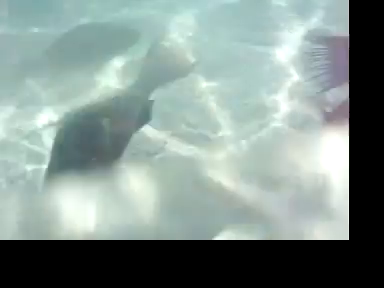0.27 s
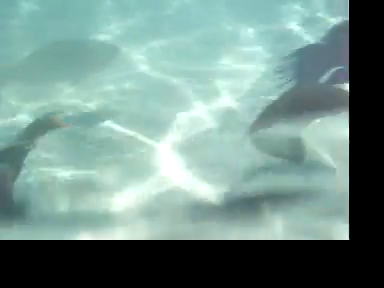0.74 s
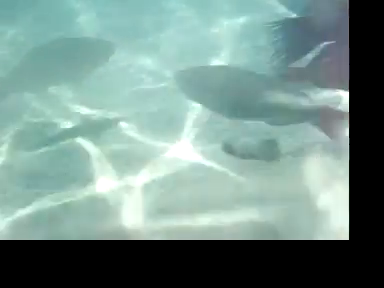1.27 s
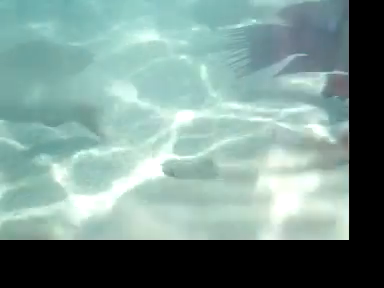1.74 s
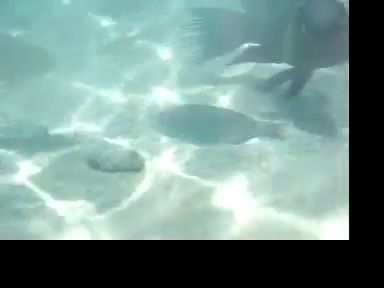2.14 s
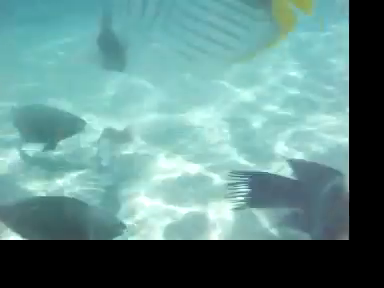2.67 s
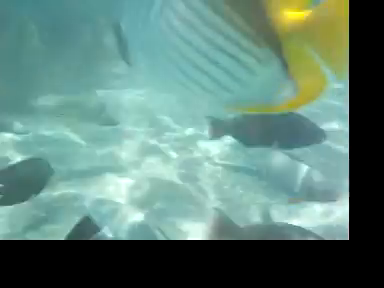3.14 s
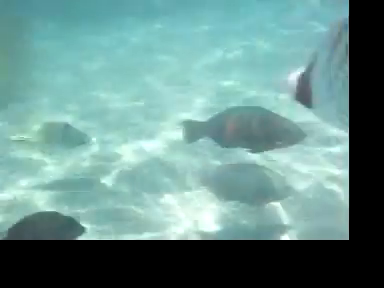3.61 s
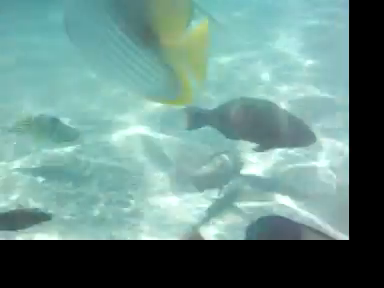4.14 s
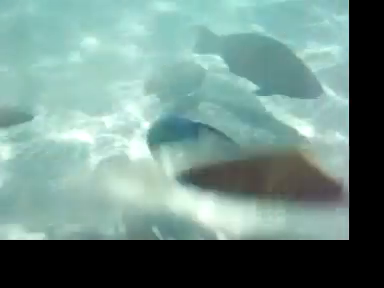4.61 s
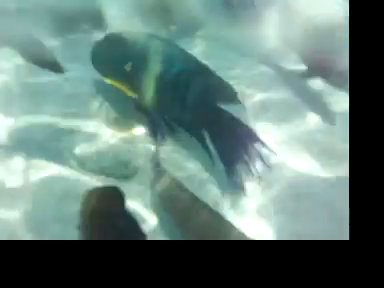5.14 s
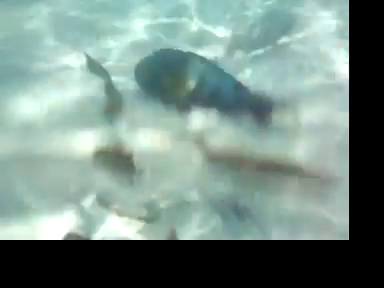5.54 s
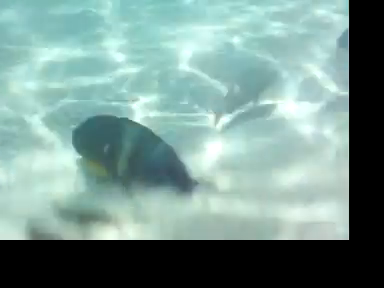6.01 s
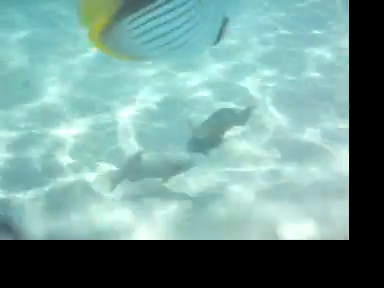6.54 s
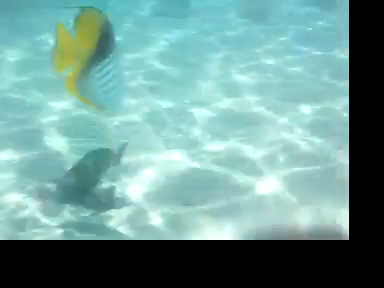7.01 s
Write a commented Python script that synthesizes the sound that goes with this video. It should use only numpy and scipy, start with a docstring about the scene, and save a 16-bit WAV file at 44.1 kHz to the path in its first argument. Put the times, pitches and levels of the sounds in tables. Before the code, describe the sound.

Underwater, muffled low rumble and gurgling currents wash round a submerged microphone, with deep bubble glugs, then two sharp clicks around a dull knock.

```python
"""Shallow sea water rumbles, gurgles, washes and hisses round a waterproof camera case: shaped, drifting noise.
Air pockets glug and small bubbles blip as gliding sines; fizz is clouds of impulses, faint ticks are
band-passed noise bursts. Near the end the case rings under two sharp clicks with a duller knock between;
the first click pushes the recorder's gain down."""
import sys
import numpy as np
from scipy import signal
from scipy.fft import rfft, irfft, next_fast_len
from scipy.io import wavfile
from scipy.ndimage import uniform_filter1d, map_coordinates

SR = 44100
rng = np.random.default_rng(int(sys.argv[2]) if len(sys.argv) > 2 else 0)


def digitize_waveform(pressure):
    """Quantize a signal to 16-bit integers and store it at the path in sys.argv[1].

    Rows of a 2-D input are taken as channels; values are limited to [-1, 1].
    """
    field = np.atleast_2d(pressure).T
    bounded = np.clip(field, -1, 1)
    quanta = np.round(bounded * 32767).astype(np.int16)
    wavfile.write(sys.argv[1], SR, quanta)


N = 321048


def amp(db):
    """Decibels to gain."""
    return 10 ** (np.asarray(db) / 20)


def unit(x):
    """x at rms 1."""
    return x / np.sqrt(np.mean(x ** 2) + 1e-20)


def seconds(length):
    """Time axis in s."""
    return np.arange(length) / SR


def add(track, t_s, sound):
    """Mix a sound into the track at t_s."""
    part = track[round(t_s * SR):][:len(sound)]
    part += sound[:len(part)]


def curve(points):
    """(t/s, value) points joined by straight lines, one value per sample."""
    return np.interp(seconds(N), *np.transpose(points))


def bell(t_s, half_s):
    """Bell-shaped rise and fall of height 1 round t_s."""
    return np.exp(-np.minimum(((seconds(N) - t_s) / half_s) ** 2, 20))


def wobble(rate_hz):
    """Smooth random curve, rate_hz knots a second."""
    knots = rng.standard_normal(int(N * rate_hz / SR) + 4)
    return map_coordinates(knots, [seconds(N) * rate_hz])


def filtered(x, response):
    """x times a response of frequency."""
    m = next_fast_len(N + SR // 2)
    f_hz = np.fft.rfftfreq(m, 1 / SR)
    return irfft(rfft(x, m) * response(f_hz), m)[:N]


def coloured(x, spectrum):
    """x shaped by (f/Hz, level/dB) points, at rms 1."""
    f, db = np.transpose(spectrum)
    return unit(filtered(x, lambda hz: amp(np.interp(np.log(hz + 1), np.log(f), db))))


def low_pass(x, edge_hz, order):
    """Steep, flat-topped low-pass."""
    return filtered(x, lambda hz: 1 / np.sqrt(1 + (hz / edge_hz) ** (2 * order)))


def eddies(depth_db, rate_hz):
    """Noise that swells and sinks as eddies pass, at rms 1."""
    return unit(amp(depth_db * wobble(rate_hz)) * rng.standard_normal(N))


def specks(rate_hz, spread_db):
    """Random impulses of uneven size and either sign, at rms 1."""
    size_db = spread_db * np.minimum(rng.exponential(size=N), 3)
    sizes = amp(size_db) * rng.choice([-1, 1], N)
    return unit(sizes * (rng.random(N) < rate_hz / SR))


# slow heave of the sea: t/s, level/dB
HEAVE = [(0, -5), (.9, -4.5), (2.25, -1), (2.75, 3), (4.15, 1.5), (4.6, 4.5), (5.6, 0.5), (6.25, 1),
         (7.28, 3)]


def swell():
    """Heave of the sea in dB."""
    return curve(HEAVE)


# current along the case, over a calm flow: t/s, level/dB
FLOW_DRIFT = [(0, 0), (.55, 0), (1.3, -2), (1.7, 7.5), (2.2, 8), (2.55, 2.5), (3.1, 2), (4.3, -0.5),
              (4.58, -2), (4.85, 6), (5.3, 5), (5.65, -0.5), (6.2, 0.5), (7.28, -2)]
# brief surges on top: t/s, level/dB, half length/s
FLOW_SURGES = [(.68, 2.5, 0.076), (3.633, 11.5, 0.027), (4.72, 12, 0.044), (5.385, 7, 0.031),
               (7.183, 7.5, 0.028)]


def current():
    """Strength of the flow in dB: slow drift plus brief surges."""
    return curve(FLOW_DRIFT) + sum(db * bell(t, half) for t, db, half in FLOW_SURGES)


# rumble colour: f/Hz, level/dB per Hz
RUMBLE_COLOUR = [(5, -24), (14, -2.5), (24, 0), (42, -7), (70, -6.5), (110, -16.5), (300, -73.5)]
RUMBLE_CALM_DB = -35.5


def rumble(swell_db):
    """Deepest noise of the moving water, follows the swell dB for dB."""
    return amp(RUMBLE_CALM_DB + swell_db) * coloured(eddies(depth_db=1.5, rate_hz=9), RUMBLE_COLOUR)


# gurgle colour: f/Hz, level/dB per Hz
GURGLE_COLOUR = [(40, -31.5), (75, -15), (105, -2.5), (135, -1.5), (165, -5), (210, -15.5), (300, -37.5),
                 (700, -70.5)]
GURGLE_CALM_DB = -39.5
GURGLE_DB_PER_FLOW_DB, GURGLE_DB_PER_SWELL_DB = 0.57, 0.16


def gurgle(flow_db, swell_db):
    """Low noise of the current along the case, partly follows flow and swell."""
    level_db = GURGLE_CALM_DB + GURGLE_DB_PER_FLOW_DB * flow_db + GURGLE_DB_PER_SWELL_DB * swell_db
    return amp(level_db) * coloured(eddies(depth_db=3.0, rate_hz=20), GURGLE_COLOUR)


# wash colour: f/Hz, level/dB per Hz
WASH_COLOUR = [(110, -30.5), (210, 2.5), (300, -0.5), (450, -3), (620, -9.5), (900, -18), (1200, -19.5),
               (1600, -22.5), (4000, -42)]
WASH_CALM_DB = -51.5


def wash(flow_db):
    """Middle noise of the current, follows the flow dB for dB."""
    return amp(WASH_CALM_DB + flow_db) * coloured(eddies(depth_db=3.0, rate_hz=35), WASH_COLOUR)


# case hollow resonances: f/Hz, width/Hz, level/dB
HOLLOW_MODES = [(736, 77, 1.5), (1034, 60, 0.5), (1180, 77, -6)]
# ring of the hollow under the trickle: t/s, level/dB
TRICKLE_LEVEL = [(0, -60), (.3, -57.5), (.8, -57.5), (1.25, -60.5), (1.55, -51.5), (2.75, -55), (3.15, -61),
                 (3.6, -55.5), (4.1, -61.5), (5.1, -56.5), (5.6, -62), (7.28, -59.5)]


def hollow_response(f_hz):
    """Sum of resonances, neighbours in opposite polarity."""
    total = 0
    for k, (centre, width, db) in enumerate(HOLLOW_MODES):
        damping = 1j * f_hz * width
        total = total + (-1) ** k * amp(db) * damping / (centre * centre - f_hz * f_hz + damping)
    return total


def trickle():
    """Trickling water, noise plus impulses, rings a hollow in the case."""
    drive = eddies(depth_db=4.0, rate_hz=24) + specks(rate_hz=93, spread_db=-1.0)
    return amp(curve(TRICKLE_LEVEL)) * unit(filtered(drive, hollow_response))


# hiss colour: f/Hz, level/dB per Hz
HISS_COLOUR = [(100, -7), (500, -3.5), (1400, 1.5), (2000, 0), (2450, 4), (2900, -0.5), (3400, 0.5),
               (3700, -4.5), (4100, -13)]
HISS_CALM_DB = -53.5
HISS_DB_PER_FLOW_DB, HISS_DB_PER_SWELL_DB = 0.089, 0.42


def hiss(flow_db, swell_db):
    """High noise with crackle, partly follows flow and swell."""
    level_db = HISS_CALM_DB + HISS_DB_PER_FLOW_DB * flow_db + HISS_DB_PER_SWELL_DB * swell_db
    crackle = amp(-6) * specks(rate_hz=140, spread_db=3.5)
    return amp(level_db) * coloured(eddies(depth_db=1.22, rate_hz=35) + crackle, HISS_COLOUR)


def water():
    """All noise of the moving water, on one shared flow and swell."""
    flow_db, swell_db = current(), swell()
    low = rumble(swell_db) + gurgle(flow_db, swell_db)
    return low + wash(flow_db) + trickle() + hiss(flow_db, swell_db)


def bubbles(table, glide, rough):
    """Each body of air swells, pulsates and dies; its pitch glides, and trembles as the flow deforms it."""
    track, t = np.zeros(N), seconds(SR // 5)
    for t_s, db, f_hz, swell_s in table:
        age = t / max(swell_s, 1e-3)
        envelope = age * np.exp(1 - age)  # peak 1 at age 1
        tremble = unit(uniform_filter1d(rng.standard_normal(len(t)), size=60))
        pitch_hz = f_hz * (1 + glide * np.tanh(age / 4) + rough * tremble)
        phase = 2 * np.pi * np.cumsum(pitch_hz) / SR
        add(track, t_s, amp(db) * envelope * np.sin(phase))
    return track


# air pockets: t/s, peak level/dB, f/Hz, swell/s
AIR_POCKETS = [(.805, -25.5, 120, .008), (1.378, -14, 146.3, 0.011), (1.38, -21, 85.5, 0.013),
               (1.394, -18, 145, 0.0097), (1.417, -17.5, 138.5, 0.0058), (1.530, -6, 149.5, 0.0054),
               (1.534, -18, 95.7, 0.013), (1.566, -20, 141, 0.0063), (1.634, -18.5, 224, 0.004),
               (1.646, -24.5, 126, 0.0036), (1.682, -23, 129, 0.006), (2.285, -27, 284, 0.004),
               (2.725, -22.5, 97.5, 0.0068), (3.068, -20.5, 114, 0.0061), (3.97, -22.5, 119.6, 0.0085),
               (4.081, -22, 111, 0.0052), (4.404, -19, 362, 0.0029), (4.4068, -3.5, 131.2, 0.0068),
               (4.674, -16, 129.2, 0.016), (4.726, -14, 141, 0.013), (4.768, -18, 137.4, 0.016),
               (4.784, -8, 99, 0.0064)]


def glugs():
    """Large air pockets pulsate low, pitch gliding down."""
    return bubbles(AIR_POCKETS, glide=-0.018, rough=0.027)


def struck(blows, modes, rise_s, crack_db, crack_t60_s):
    """Every blow cracks and rings the same modes; neighbouring modes start in opposite directions."""
    track, t = np.zeros(N), seconds(SR // 4)
    ring = np.zeros(len(t))
    for k, (f_hz, db, t60_s) in enumerate(modes):
        ring += (-1) ** k * amp(db - 60 * t / t60_s) * np.sin(2 * np.pi * f_hz * t)
    onset = 1 - np.exp(-t / rise_s)
    for t_s, db in blows:
        crack = amp(crack_db - 60 * t / crack_t60_s) * rng.standard_normal(len(t))
        add(track, t_s, amp(db) * (ring + crack) * onset)
    return track


# sharp clicks on the case: t/s, level/dB
CLICK_BLOWS = [(6.3098, 16.5), (6.9066, 6)]
# case ring: f/Hz, level/dB, t60/s
CASE_MODES = [(131, -21, 0.1), (330, -27.5, 0.048), (460, -19, 0.036), (700, -20.5, 0.062),
              (770, -27.5, 0.051), (1113, -7.5, 0.018), (1210, -49, 0.18), (1365, -5, 0.016),
              (1580, -23.5, 0.006), (1714, -18, 0.016), (2075, -15.5, .022), (2400, -8, 0.015),
              (2720, -10, 0.0085), (3495, -6, 0.0082), (3850, -15, 0.0034)]


def clicks():
    """Sharp blows ring the case."""
    return struck(CLICK_BLOWS, CASE_MODES, rise_s=0.0019, crack_db=-5.0, crack_t60_s=0.015)


# duller knock on the case: t/s, level/dB
KNOCK_BLOWS = [(6.7988, 8)]
# its short, hollow answer: f/Hz, level/dB, t60/s
THUD_MODES = [(92.4, -16.5, 0.14), (237, -14, 0.033), (398, -8.5, 0.021), (740, -7, 0.014),
              (1470, -30.5, 0.015), (1920, -18, 0.012), (2974, -9, 0.0083), (3380, -1.5, 0.003)]


def knocks():
    """A duller blow gets a short, hollow answer."""
    return struck(KNOCK_BLOWS, THUD_MODES, rise_s=0.00025, crack_db=-14, crack_t60_s=0.01)


# small bubbles: t/s, peak level/dB, f/Hz, swell/s
SMALL_BUBBLES = [(.136, -44, 765, 0.006), (.225, -47, 880, 0.0056), (.45, -42, 993, 0.0064),
                 (.715, -39.5, 724, 0.0085), (.905, -44.5, 2325, 0.0077), (.945, -45, 2390, 0.0033),
                 (1.491, -34.5, 736, 0.0048), (1.60, -43, 980, 0.0072), (2.075, -38.5, 2340, 0.0014),
                 (2.825, -38, 730, 0.0029), (2.871, -43, 2440, 0.002), (2.929, -29, 481, 0.0036),
                 (5.155, -37, 1160, 0.0061)]


def blips():
    """Small bubbles pulsate high, pitch gliding up."""
    return bubbles(SMALL_BUBBLES, glide=0.025, rough=0.022)


STRAY_OVER_TRICKLE_DB, STRAY_SPREAD_DB = 3.5, 3
STRAY_DETUNE_SHARE, STRAY_SWELL_S = .04, 0.0033


def strays(count):
    """Tiny bubbles at random moments, near the hollow's resonances, louder as the trickle grows."""
    when, which = rng.random((count, 2)).T
    size, detune = rng.standard_normal((count, 2)).T
    t_s = when * N / SR
    trickle_db = np.interp(t_s, *np.transpose(TRICKLE_LEVEL))
    db = trickle_db + STRAY_OVER_TRICKLE_DB + STRAY_SPREAD_DB * size
    mode = (which * len(HOLLOW_MODES)).astype(int)
    f_hz = np.array(HOLLOW_MODES)[mode, 0] * np.exp(STRAY_DETUNE_SHARE * detune)
    return bubbles(zip(t_s, db, f_hz, [STRAY_SWELL_S] * count), glide=.03, rough=.02)


# fizz without a glug: t/s, level/dB, half length/s
LONE_PUFFS = [(.77, -56, .04), (.92, -51.5, 0.032), (1.42, -62, .07), (2.39, -50.5, 0.026),
              (2.76, -54, 0.061), (4.2, -47, 0.057), (4.74, -54, 0.041), (5.16, -54, 0.019)]
# fizz colour: f/Hz, level/dB per Hz
FIZZ_COLOUR = [(200, -8), (600, 4.5), (1000, 1), (1400, -1.5), (1900, -3), (2400, 0.5), (2850, 0),
               (3250, -2), (4000, -12.5)]
PUFF_OVER_GLUG_DB, PUFF_HALF_S, PUFF_LAG_S = -39.5, .02, 0.0046


def fizz():
    """Clouds of the finest bubbles crackle past: one shaken loose by each glug, a few on their own."""
    glug_puffs = [(t + PUFF_LAG_S, db + PUFF_OVER_GLUG_DB, PUFF_HALF_S) for t, db, _, _ in AIR_POCKETS]
    cloud = sum(amp(db) * bell(t, half) for t, db, half in LONE_PUFFS + glug_puffs)
    return cloud * coloured(specks(rate_hz=1500, spread_db=3.5), FIZZ_COLOUR)


# ticks, level before gain_db and fall: t/s, level/dB, f/Hz, fall to either side/dB per octave
TICK_EVENTS = [(0.310, -45, 800, 23), (0.505, -47.5, 1250, 9.5), (0.712, -39, 440, 16),
               (0.893, -42.5, 1700, 10), (1.442, -49, 2240, 4.5), (1.682, -36.5, 2160, 25),
               (2.353, -47.5, 2370, 4.5), (2.801, -34.5, 750, 8), (2.929, -35, 440, 7),
               (3.815, -45.5, 1500, 2.5), (3.845, -45, 3000, 4), (4.405, -38.5, 450, 6),
               (4.416, -31.5, 900, 5.5), (4.509, -26, 600, 11), (4.542, -49.5, 2930, -3),
               (4.73, -40.5, 1000, 13), (5.159, -34.5, 1530, 21), (5.422, -49, 2680, 5)]
# where the case lets sound in: low edge f/Hz, high edge f/Hz
CASE_PASSBANDS = [(300, 760), (980, 1630), (2050, 2620), (3150, 3850)]
TICK_T60_S = 0.028


def ticks(rise_s, gain_db):
    """Brief cracks through the case's passbands, each band weighted by its octaves from the tick's pitch."""
    track, t = np.zeros(N), seconds(SR // 10)
    shape = amp(-60 * t / TICK_T60_S) * (1 - np.exp(-t / rise_s))
    for t_s, db, f_hz, fall_db in TICK_EVENTS:
        for edges_hz in CASE_PASSBANDS:
            octaves = abs(np.mean(np.log2(edges_hz)) - np.log2(f_hz))
            band = signal.butter(2, edges_hz, "bandpass", fs=SR, output="sos")
            crack = signal.sosfilt(band, shape * rng.standard_normal(len(t)))
            add(track, t_s, amp(db + gain_db - fall_db * octaves) * unit(crack))
    return track


def scene():
    """Water, air and the case, all at one microphone."""
    air = glugs() + blips() + strays(count=110) + fizz()
    case = clicks() + knocks() + ticks(rise_s=0.00018, gain_db=-11.5)
    return (water() + air + case)[None]


def gain_control(x, threshold_db, sag_db_per_s):
    """Power over the threshold cuts the gain at once; the gain never recovers and sags steadily throughout."""
    power = np.abs(uniform_filter1d(x ** 2, size=150))
    over_db = np.maximum(10 * np.log10(power + 1e-12) - threshold_db, 0)
    sag_db = sag_db_per_s * seconds(N)
    cut_db = np.maximum.accumulate(over_db - sag_db) + sag_db
    return x * amp(-cut_db)


CLIP_TOP = .72  # of full scale
TOP_HZ = 16000


def clipped(x, hardness):
    """Peaks flatten against the recorder's ceiling, with slightly rounded corners."""
    return x / (1 + np.abs(x / CLIP_TOP) ** hardness) ** (1 / hardness)


def record(dry):
    """Narrow-band recorder with gain control and a clipping ceiling."""
    x = low_pass(dry[0], edge_hz=3968, order=40)
    x = gain_control(x, threshold_db=-7.5, sag_db_per_s=0.26)
    x = clipped(x, hardness=14)
    return low_pass(x, TOP_HZ, order=150)[None]


dry = scene()
out = record(dry)
digitize_waveform(out)
```